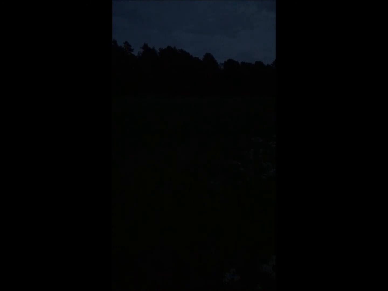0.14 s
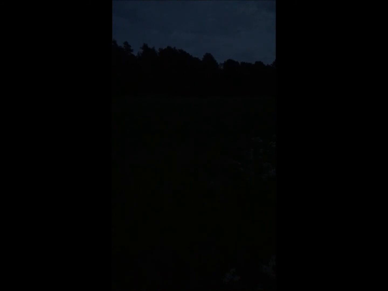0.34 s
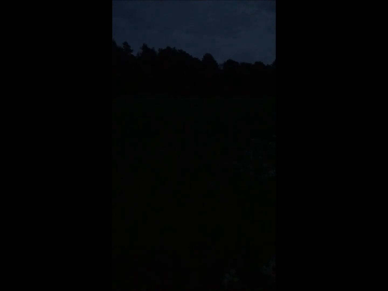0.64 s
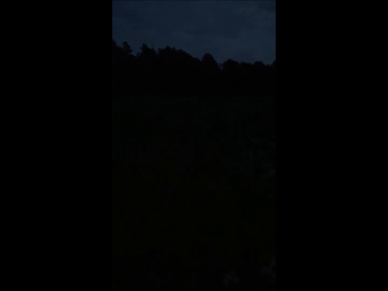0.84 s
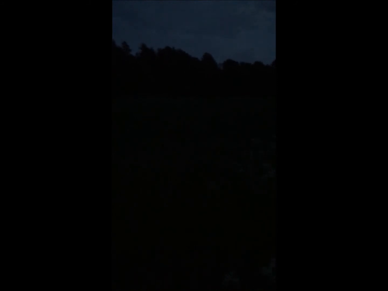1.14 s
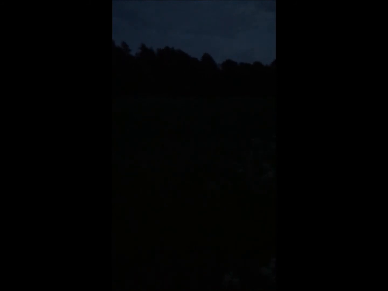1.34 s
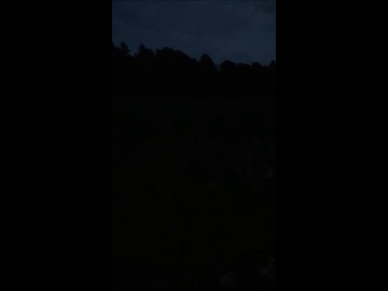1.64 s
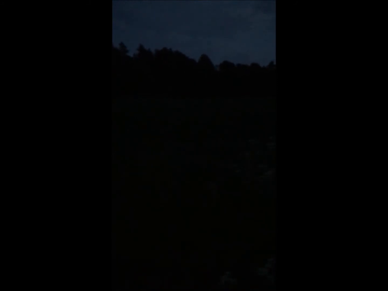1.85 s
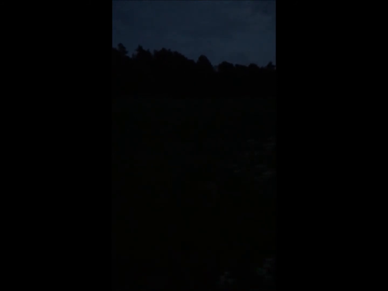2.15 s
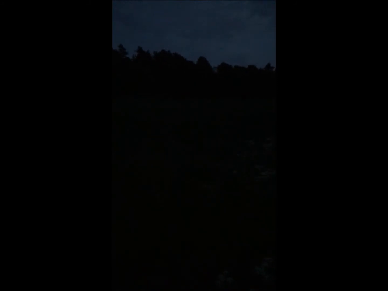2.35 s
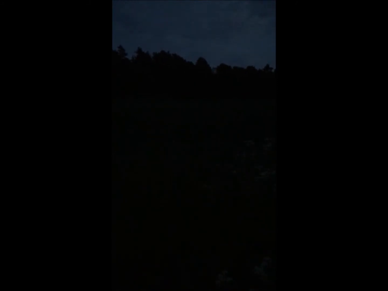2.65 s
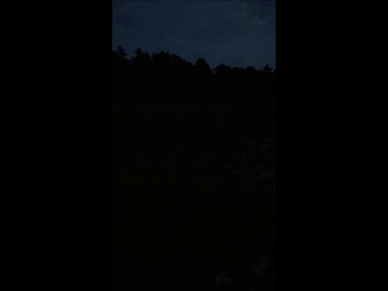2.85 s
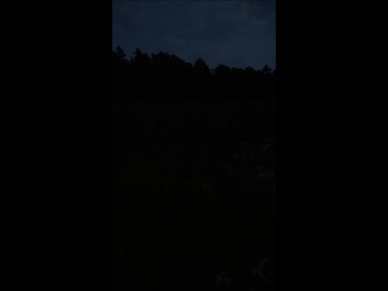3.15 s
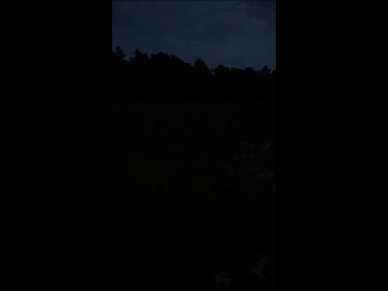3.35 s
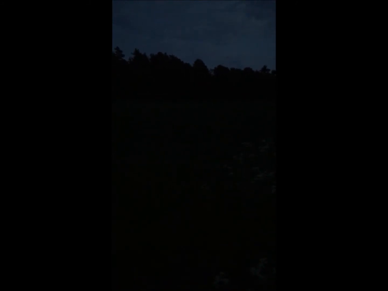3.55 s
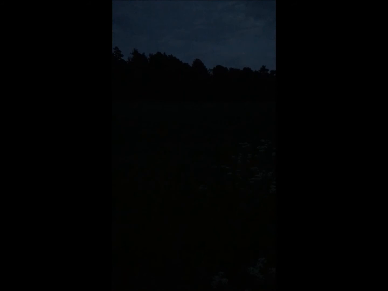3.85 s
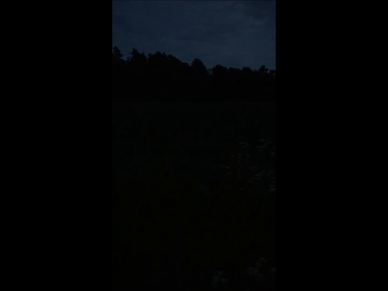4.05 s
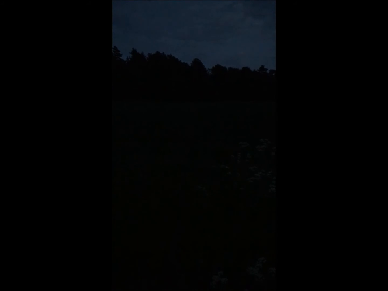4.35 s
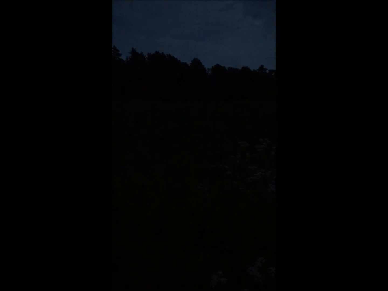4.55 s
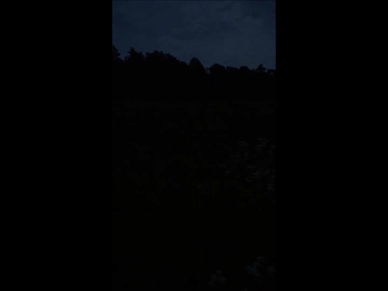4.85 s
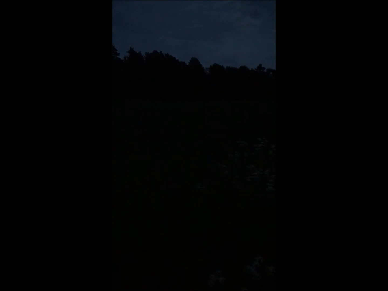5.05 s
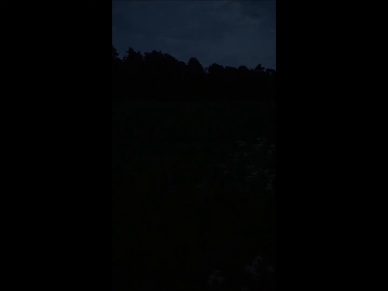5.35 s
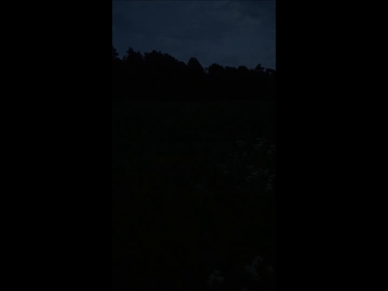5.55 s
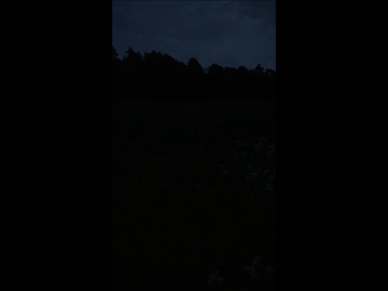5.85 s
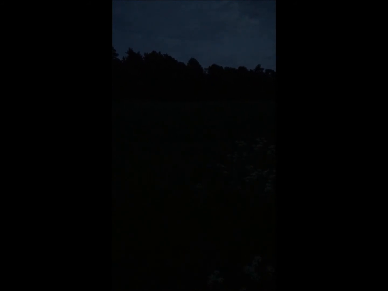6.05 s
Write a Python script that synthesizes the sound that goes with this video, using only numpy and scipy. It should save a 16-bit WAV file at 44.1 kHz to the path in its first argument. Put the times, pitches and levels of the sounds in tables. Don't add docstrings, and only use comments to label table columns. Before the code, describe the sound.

A dusky open field, heard by a single microphone. Right at 0 s comes the clipped final note of a near quail's call. Full calls follow at about 0.7, 1.8, 2.8 and 4.0 s: one sharp liquid whistle, a gap of about 0.2 s, then two quick whistles close together. Every note is very short, climbing near 1.8 kHz and whipping steeply upward before stopping dead. The call near 3 s is loudest and brightest. A small hoarse churr drops in pitch just before each last note. Stalks and trees leave a brief grainy echo. A far second quail gives faint notes around 0.2-0.3, 1.4 and 2.5 s. Very quiet low rumble, soft air, thin distant hums and hiss lie beneath; the deep drone grows slightly by 2 s and again near 5 s. After 4.4 s no more calls, only this faint bed until about 6 s.

```python
import sys
import numpy as np
from scipy import signal
from scipy.fft import rfft, irfft, next_fast_len
from scipy.io import wavfile
from scipy.ndimage import uniform_filter1d, map_coordinates

SR = 44100
rng = np.random.default_rng(int(sys.argv[2]) if len(sys.argv) > 2 else 0)


def field_ratio(decibels):
    return 10 ** (np.asarray(decibels, dtype=float) / 20)


def to_wav(sig):
    pcm = np.clip(np.atleast_2d(sig), -1, 1) * 32767
    pcm = np.round(pcm).astype(np.int16)
    wavfile.write(sys.argv[1], SR, pcm.T)


N = 273683
TOP_HZ = 15830


def unit(x):
    return x / np.sqrt(np.mean(x ** 2) + 1e-20)


def along(points, hz):
    f, v = np.transpose(points)
    return np.interp(np.log(hz + 1), np.log(f + 1), v)


def wobble(rate, size=N):
    knots = rng.standard_normal(int(size * rate / SR) + 4)
    return map_coordinates(knots, [np.arange(size) * rate / SR])


def noise(spectrum, size=N):
    m = next_fast_len(size)
    white = rfft(rng.standard_normal(m))
    coloured = irfft(white * field_ratio(along(spectrum, np.fft.rfftfreq(m, 1 / SR))), m)
    return unit(coloured[:size])


def swell(ms, peak_ms, peak_db, rise_ms, fall_ms):
    slope_ms = np.where(ms < peak_ms, rise_ms, fall_ms)
    return field_ratio(peak_db - 3 * ((ms - peak_ms) / slope_ms) ** 2)


def add(track, s, sound):
    track[round((s + 1) * SR):][:len(sound)] += sound


def background():
    # time in seconds, level in dB.
    drone_course = [
        (0, -70.5),
        (1, -64),
        (2, -55.5),
        (3, -55),
        (3.7, -58.5),
        (4.302, -57),
        (4.9, -51.5),
        (5.9, -51.5),
        (6.2, -50.5),
    ]
    # frequency in Hz, density in dB per Hz.
    rumble_spectrum = [(29, -31.5), (50, -5), (84, -5.5), (100, -13), (113, -15.5), (151, -31), (200, -32),
                       (260, -57.5), (440, -120)]
    air_spectrum = [(76, -33.5), (130, 1), (313, -6.5), (363, -5), (448, -7.5), (657, -5.5), (753, -7.5),
                    (989, -9.5), (2500, -28.5), (3250, -54.5), (5500, -120)]
    hiss_spectrum = [(1060, -34), (1800, -3), (3030, -4), (4880, -10), (6130, -6), (7770, -9), (9420, -5),
                     (10500, -9), (11200, -4), (13400, -2.5), (13900, 1), (14400, -3.5), (15300, -2),
                     (16000, -8)]
    drone_db = np.interp(np.arange(N) / SR, *np.transpose(drone_course))
    drone_hz = 44.5 + 2.5 * wobble(12.0)
    drone = np.sin(2 * np.pi * np.cumsum(drone_hz) / SR) * field_ratio(1.5 * wobble(5.2))
    rumble = noise(rumble_spectrum) * field_ratio(.8 * wobble(3.5))
    air = noise(air_spectrum) * field_ratio(.7 * wobble(3))
    return field_ratio(drone_db) * drone + field_ratio(-58.5) * rumble + field_ratio(-66) * air + field_ratio(-70.5) * noise(hiss_spectrum)


def whistle(place, effort_db, unsteady_db):
    # attack in dB/ms, swell in dB/ms, catch at the step in dB, lead-in in dB, lead-in in Hz.
    note_manner = [
        (5.5, .78, 6, -50, 1000),
        (2.4, .92, 3, -44, 1300),
        (2.1, .48, 8, -41, 1000),
    ]
    # top of the note relative to its row level in dB, by place in the call.
    full_level = [
        -2.5,
        -2.5,
        -1.5,
    ]
    # multiple of the fundamental, level in dB.
    overtone_levels = [(.5, -13), (2, -0.5), (3, -15.5), (4, -40), (5, -37), (6, -50), (7, -48.5), (8, -42)]
    # frequency in Hz, gain in dB.
    beak_colour = [(800, -3), (3000, -2), (4500, 2.5), (5500, -9.5), (6600, 9), (7500, -6.5), (9200, -4),
                   (10400, -17), (12500, -13.5), (15000, -4.5), (16500, -11.5)]
    # frequency in Hz, density in dB per Hz.
    breath_spectrum = [(5000, -39), (6500, -5.5), (7500, -10), (9200, -0.5), (10400, -18.5), (12500, -15),
                       (14000, -6), (15200, -1), (16500, -8)]
    step_ms, voiced_ms, peak_ms, cut_ms, young_ms = -12.3, -15.5, -.5, 1.7, -19
    attack, growth, catch_db, lead_db, lead_hz = note_manner[place]
    t = np.arange(SR // 16) * 1000 / SR - 50
    before = lambda ms: np.clip(ms - t, 0, None)
    after = lambda ms: np.clip(t - ms, 0, None)

    low = 1 / (1 + np.exp((t - step_ms) / .6))
    rise_hz = 725 * np.exp(t / 2.21)
    rise_hz = rise_hz / (1 + (rise_hz / 3420) ** 3) ** (1 / 3)
    hz = np.maximum(1856.6 - 157.2 * low - 30.09 * before(step_ms), lead_hz) + rise_hz
    onset = np.clip(-t / 25, 0, 1.5)
    jitter = (.003 + 0.0023 * onset ** 2) * wobble(140, size=len(t))
    pitch = hz * (1 + 0.004 * rng.standard_normal() + jitter)
    turn = 2 * np.pi * np.cumsum(pitch) / SR + 2 * np.pi * rng.random()

    voiced_db = -growth * (before(peak_ms) - before(step_ms)) - catch_db * low - attack * before(voiced_ms)
    level_db = np.maximum(voiced_db, lead_db + .6 * before(voiced_ms)) - 10.5 * after(cut_ms)

    young_db = np.maximum(-10 - .5 * before(young_ms) - 1.8 * after(young_ms), -34)
    clean_db = 9 * rise_hz / 1000
    breath_db = -42 - clean_db / 2 + effort_db - .45 * level_db * (t < cut_ms)
    tone = np.sin(turn) + field_ratio(breath_db) * noise(breath_spectrum, size=len(t))
    for k, db in overtone_levels:
        clear = np.clip(1.7 - 0.18 * k, 0, 1)
        flutter = clear * field_ratio(2.5 * wobble(200, size=len(t))) + (1 - clear) * wobble(1500, size=len(t))
        drive_db = young_db + .4 * effort_db if k < 4 else effort_db - clean_db
        gain = field_ratio(db + drive_db + along(beak_colour, k * pitch))
        tone += gain * flutter * np.sin(k * turn) * (k * pitch < TOP_HZ)

    sounding = np.clip((t + 42) / 6, 0, 1) * (t < 5)
    shake_db = unsteady_db * (.8 + 2 * onset) * wobble(230, size=len(t))
    throat_db = 2.2 * (np.exp(-((hz - 2850) / 850) ** 2) - 0.5)
    gain = uniform_filter1d(field_ratio(full_level[place] + throat_db + level_db + shake_db), size=31)
    return tone * sounding * gain


def field(sound, scatter_db):
    # frequency in Hz, decay time to -60 dB in seconds.
    stalk_decay = [(500, .05), (1850, 0.11), (2200, .08), (3000, 0.078), (5000, 0.15), (7000, 0.062),
                   (10000, 0.018)]
    # delay in seconds, smear in seconds, level in dB.
    echo_paths = [
        (0.027, .009, -28.5),
        (.055, .008, -37.5),
        (.072, .005, -42.5),
        (0.106, .002, -49),
    ]
    hz, t, z = signal.stft(rng.standard_normal(SR // 5), SR, nperseg=128)
    tilt_db = 2.5 * np.log2(np.clip(hz, 1000, 5000) / 2500)[:, None]
    decay_db = 60 * t / along(stalk_decay, hz)[:, None]
    tail = signal.istft(z * field_ratio(tilt_db - decay_db), SR, nperseg=128)[1][:SR // 5]
    path = field_ratio(scatter_db) * tail / np.linalg.norm(tail)
    lag = np.arange(len(path)) / SR
    for delay, smear, db in echo_paths:
        clump = rng.standard_normal(len(path)) * np.exp(-.5 * ((lag - delay) / smear) ** 2)
        path += field_ratio(db) * clump / np.linalg.norm(clump)
    path[0] = 1
    return signal.fftconvolve(sound, path)


def quail():
    # whip in seconds, level in dB, place in the call from 0 to 2.
    near_notes = [(.0096, -20, 2), (0.6919, -23.5, 0), (0.9148, -19, 1), (1.0597, -19.5, 2),
                  (1.7737, -21.5, 0), (1.997, -18, 1), (2.1398, -19, 2), (2.7722, -16.5, 0),
                  (2.9985, -15, 1), (3.1436, -16.5, 2), (4.0033, -20.5, 0), (4.221, -18, 1),
                  (4.365, -18, 2)]
    track = np.zeros(N + 2 * SR)
    for s, db, place in near_notes:
        place = int(place)
        note = whistle(place, effort_db=1.1 * (db + 20) + 1.8 * place, unsteady_db=.7)
        add(track, s - .05, field_ratio(db) * field(note, scatter_db=-14.5))
        if place == 1:
            rasp = churr(throb_hz=56.8, grains=1000, spread=1.05)
            add(track, s, field_ratio(db) * field(rasp, scatter_db=-4.5))
    return track[SR:SR + N]


def far_quail():
    # whip in seconds, level in dB, scatter in dB.
    far_notes = [
        (0.193, -65.5, 6.5),
        (0.301, -61, -11.5),
        (1.352, -59.5, -14.5),
        (1.456, -61.5, -7),
        (2.537, -64.5, -15),
    ]
    track = np.zeros(N + 2 * SR)
    for s, db, scatter_db in far_notes:
        note = whistle(0, effort_db=0, unsteady_db=2.8)
        add(track, s - .05, field_ratio(db) * field(note, scatter_db))
    return track[SR:SR + N]


def hums():
    # frequency in Hz, start in seconds, stop in seconds, level in dB.
    hum_tones = [
        (362, 0.28, 7.4, -83),
        (550, 1.5, 3.9, -77.5),
    ]
    t = np.arange(N) / SR
    out = np.zeros(N)
    for hz, start, stop, db in hum_tones:
        on = np.clip(np.minimum(t - start, stop - t) / 0.23 + .5, 0, 1)
        turn = 2 * np.pi * np.cumsum(hz + 5 * wobble(4.5)) / SR
        out += field_ratio(db + 3.3 * wobble(11.0)) * on * np.sin(turn)
    return out


def churr(throb_hz, grains, spread):
    start_ms, end_ms = 14, 121
    open_hz, chest_hz = 3602, 855
    now = np.arange(SR // 5) * 1000 / SR
    mouth_hz = lambda ms: np.clip(open_hz - 53 * (ms - 52), chest_hz, open_hz)
    turn = lambda hz: 2 * np.pi * np.cumsum(hz) / SR
    waver = lambda rate: wobble(rate, size=len(now))
    throb = .5 - .5 * np.cos(turn(throb_hz * (1 + .08 * waver(34))) + 1.5)

    mouth_gain = swell(now, peak_ms=72.5, peak_db=-25.5, rise_ms=9, fall_ms=13.5) * (0.81 + 0.38 * waver(700))
    out = mouth_gain * np.sin(turn(mouth_hz(now) * (1 + 0.042 * waver(200))))
    chest_gain = swell(now, peak_ms=99, peak_db=-31.5, rise_ms=42, fall_ms=12.5)
    chest_gain = chest_gain * (throb ** 0.65 + 0.34 * waver(400))
    out += chest_gain * np.sin(turn(chest_hz * (1 + 0.056 * waver(180))))

    t = np.arange(SR // 200) / SR
    for when, size, tune in rng.random((grains, 3)):
        at = start_ms + when * (end_ms - start_ms)
        hz = mouth_hz(at) * np.exp(.3 - spread * tune)
        top_db = -14 * (tune * spread < .2)
        ring = field_ratio(top_db - 7 * size - 60 * t / .007) * np.minimum(t / 0.00036, 1) * np.sin(2 * np.pi * hz * t)
        rasp_gain = swell(at, peak_ms=58.5, peak_db=-29.5, rise_ms=16.5, fall_ms=16)
        out[round(at * SR / 1000):][:len(t)] += rasp_gain * ring
    return out * (now > start_ms) * (now < end_ms)


def scene():
    return (quail() + far_quail() + background() + hums())[None]


def roll_off(x):
    return signal.sosfilt(signal.butter(12, 16540, fs=SR, output="sos"), x)


def record(dry):
    m = next_fast_len(N)
    passed = np.fft.rfftfreq(m, 1 / SR) < TOP_HZ
    mix = irfft(rfft(dry, m) * passed, m)[:, :N]
    return roll_off(mix)


dry = scene()
out = record(dry)
to_wav(out)
```